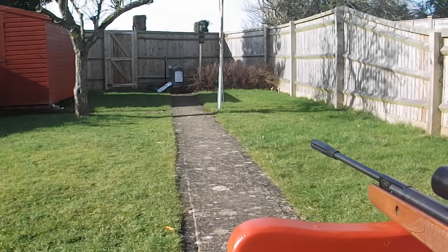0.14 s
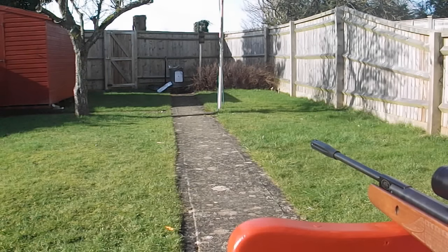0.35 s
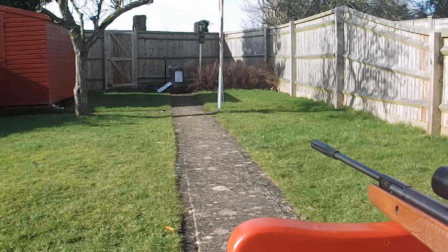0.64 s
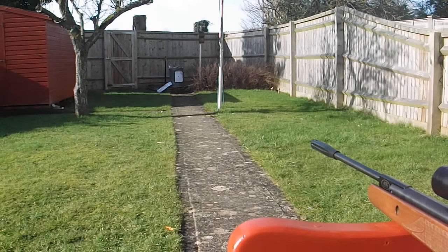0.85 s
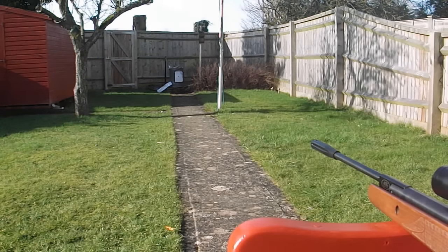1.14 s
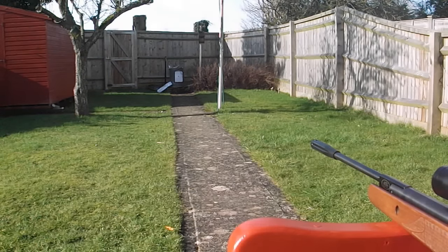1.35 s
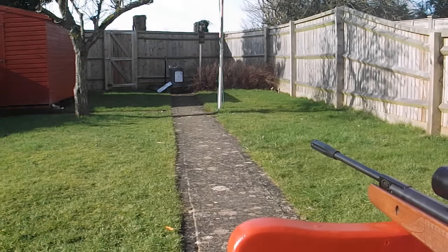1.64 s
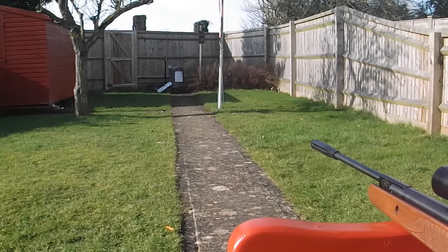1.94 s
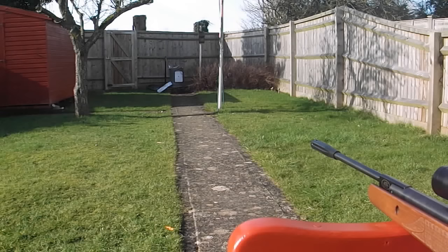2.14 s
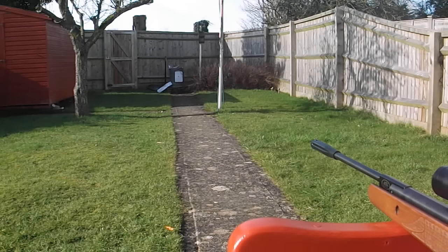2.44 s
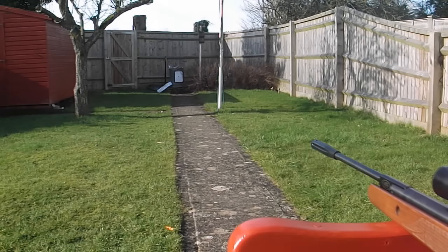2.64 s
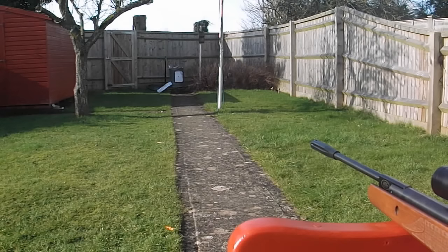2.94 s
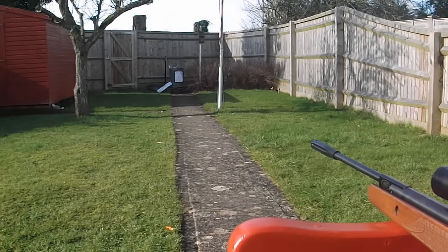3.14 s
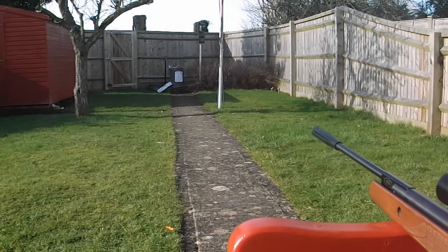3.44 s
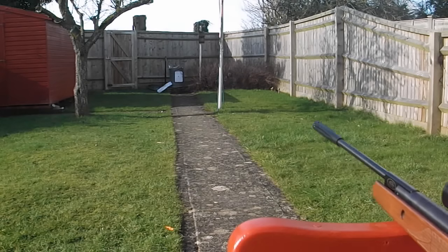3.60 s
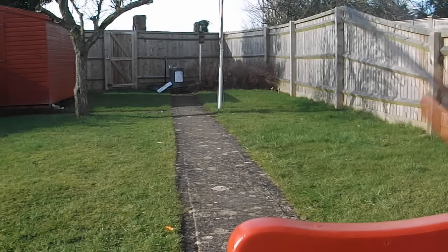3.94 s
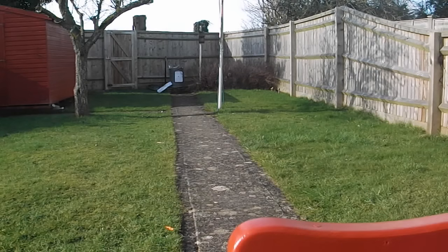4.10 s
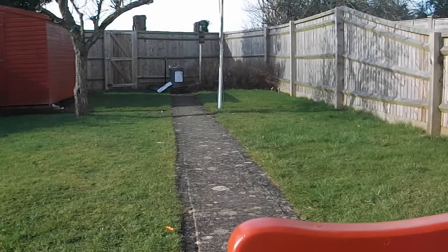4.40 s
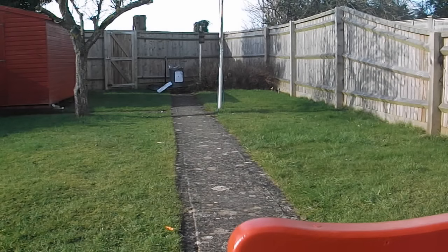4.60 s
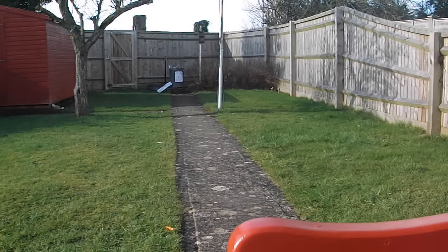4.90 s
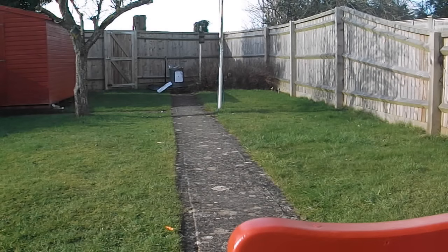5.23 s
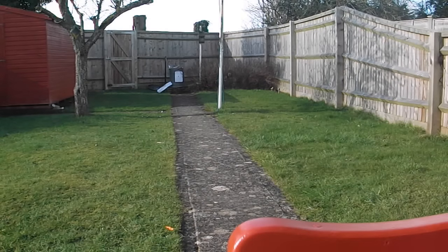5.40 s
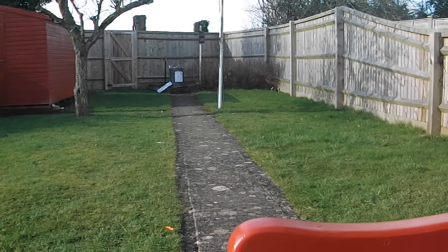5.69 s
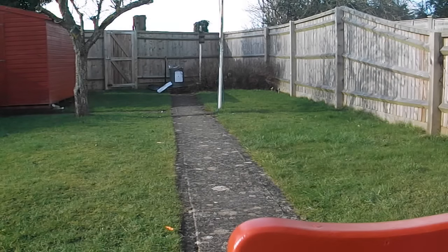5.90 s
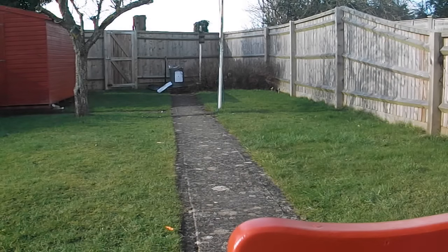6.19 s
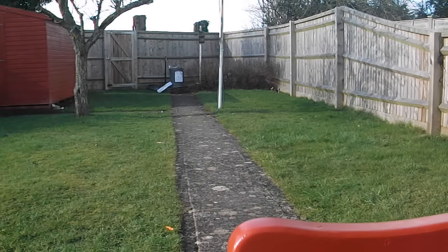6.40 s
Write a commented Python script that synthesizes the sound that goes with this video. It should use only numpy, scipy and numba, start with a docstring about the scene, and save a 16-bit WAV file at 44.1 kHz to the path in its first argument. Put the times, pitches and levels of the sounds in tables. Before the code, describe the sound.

A close outdoor camera microphone with rumble, faint hiss and thin whine. High bird whistles play for nearly three seconds until a spring air rifle snaps, clipped and dry, its pellet slapping a target a tenth of a second later. Fences and trees scatter the tail. The overloaded level drops and recovers; sleeves brush lightly, then two groups of metallic latch clicks ring out, the second with a small dry squeak.

```python
"""A fenced garden, where a spring air rifle fires once and its pellet smacks a target at the far end.
Blows are decaying coloured noise and struck modes; fences and trees add echoes and diffuse scatter.
Cloth rubs, then the action clicks as steel resonances and squeaks as a gliding harmonic tone.
Filtered noise makes distant traffic; gliding, warbling sines make a small bird.
The camera overloads on the shot: its gain control ducks the background, then lets it climb back."""
import sys
import numpy as np
from scipy import signal
from scipy.fft import irfft, next_fast_len
from scipy.io import wavfile
from numba import njit

SR = 44100
rng = np.random.default_rng(int(sys.argv[2]) if len(sys.argv) > 2 else 0)


def wav_out(sig):
    """Save sig, one row per channel (or a flat mono array), as 16-bit PCM at SR to the path in sys.argv[1]."""
    wavfile.write(sys.argv[1], SR, np.round(np.clip(np.atleast_2d(sig).T, -1, 1) * 32767).astype(np.int16))


N = 288855  # samples
T = np.arange(N) / SR  # seconds


def undb(db):
    """Level law: decibels to amplitude gain."""
    return 10 ** (np.asarray(db) / 20)


def unit(x):
    """Normalization: scale to rms 1."""
    return x / np.sqrt(np.mean(x ** 2))


def noise(points, size=N):
    """Spectral shaping: random-phase noise of rms 1 through (hz, db) points."""
    hz, db = np.transpose(points)
    padded = next_fast_len(size, True)
    f = np.fft.rfftfreq(padded, 1 / SR)
    gain = undb(np.interp(np.log(f + 1), np.log(hz), db))
    phases = np.exp(2j * np.pi * rng.random(len(f)))
    return unit(irfft(gain * phases, padded)[:size])


def band(hz, width):
    """Resonance: white noise through two equal peak filters, each of the given width, at rms 1."""
    b, a = signal.iirpeak(hz, hz / width, fs=SR)
    once = signal.lfilter(b, a, rng.standard_normal(N))
    return unit(signal.lfilter(b, a, once))


def walk(rate, size=N):
    """Slow fluctuation: random knots, rate per second, joined by lines; spread near 1."""
    knots = rng.standard_normal(2048)
    return 1.4 * np.interp(T[:size] * rate, np.arange(len(knots)), knots)


def burst(points, decay, size=4096, rise=.00012):
    """Impact on many dense modes: coloured noise rises fast and dies exponentially."""
    fade = np.exp(-T[:size] / decay)
    x = noise(points, size) * fade * (1 - np.exp(-T[:size] / rise))
    # give it the energy of the exponential fade alone
    return x * np.sqrt(np.sum(fade ** 2) / np.sum(x ** 2))


def ring(hz, decay, size=4096):
    """Modal decay: one struck mode is an exponentially damped sine."""
    return np.sin(2 * np.pi * hz * T[:size]) * np.exp(-T[:size] / decay)


def add(out, s, x):
    """Superposition: mix x into out from time s."""
    i = int(s * SR)
    out[i:i + len(x)] += x[:N - i]


def swells(events):
    """Gaussian swells: sum of envelopes; each length spans the 1/e points."""
    return sum(undb(db) * np.exp(-(2 * (T - s) / length) ** 2) for s, length, db in events)


# reflection spectrum of fences and trees: hz, relative_db
FOLIAGE_AND_BOARDS = [(100, -17), (400, -11.5), (1000, -3), (2500, 9.5), (5300, 1), (7500, -7), (11000, -3),
                      (16000, -18.5)]


def smeared_reflection(decay, size=4096):
    """Diffuse reflection: a rough obstacle answers an impulse with a noise burst of unit energy."""
    pulse = burst(FOLIAGE_AND_BOARDS, decay, size)
    return pulse / np.sqrt(np.sum(pulse ** 2))


# spectrum of the outdoor air and traffic noise: hz, relative_db
AIR_SPECTRUM = [(12, -57.5), (20, -6.5), (70, 0), (176, -21.5), (200, -26.5), (239, -24.5), (378, -32),
                (476, -27), (527, -28), (647, -25.5), (974, -21.5), (2850, -44), (5130, -53.5),
                (6620, -58.5), (9000, -66), (11700, -94.5), (19800, -120)]
# spectrum of the camera's hiss: hz, relative_db
HISS_SPECTRUM = [(3000, -28.5), (7000, -6), (10000, 1.5), (12500, 2), (14000, -6), (16000, -5)]
# steady narrow bands, low traffic drone and the camera's thin whistle: hz, width_hz of one filter, level_db
STEADY_BANDS = [(64.74, 27.5, -36), (244.2, 27, -57), (10190, 100, -80.5), (11290, 790, -68.5),
                (15120, 60, -86)]
AIR_DB = -27.5  # before rumble and tyre wash get their own gains
WHINE_HZ, WHINE_DB = 11370, -64


def background(hiss_db=-66, flutter_db=1.5, rumble_db=-2, tyres_db=-2):
    """Band-split noise: traffic rumble and tyre wash fluctuate apart, over camera hiss and whine."""
    air = undb(AIR_DB) * noise(AIR_SPECTRUM)
    rumble = signal.sosfiltfilt(signal.butter(2, 250, fs=SR, output="sos"), air)
    tyres = (air - rumble) * undb(tyres_db + .5 * walk(9))
    rumble = rumble * undb(rumble_db + flutter_db * walk(13))
    drones = sum(undb(level) * band(hz, width) for hz, width, level in STEADY_BANDS)
    # a wandering phase broadens the whine slightly
    whine = undb(WHINE_DB) * unit(np.sin(2 * np.pi * WHINE_HZ * T + 0.64 * walk(40)))
    return rumble + tyres + drones + whine + undb(hiss_db) * noise(HISS_SPECTRUM)


# cars on the distant road: nearest_s, length_s between 1/e points, tyre_centre_hz, peak_level_db
PASSING_CARS = [(.4, 0.96, 940, -45), (2.3, 0.82, 970, -44), (4.147, .4, 770, -42.5),
                (5.331, .5, 1050, -40)]


def cars(width_hz=750):
    """Proximity: each distant car swells and fades as a band of tyre noise."""
    return sum(swells([(s, length, db)]) * band(hz, width_hz) for s, length, hz, db in PASSING_CARS)


def note(length, start_hz, end_hz, warble_hz, warble_rate=190):
    """Frequency modulation: a whistle glides while its pitch warbles at random."""
    n = int(length * SR)
    hz = np.linspace(start_hz, end_hz, n) + warble_hz * walk(warble_rate, size=n)
    return signal.windows.tukey(n, .5) * np.sin(2 * np.pi * np.cumsum(hz) / SR)


# clear whistles: start_s, length_s, start_hz, end_hz, level_db before the direct and echo gains
WHISTLES = [(.02, 0.15, 5350, 4860, -52), (.91, .15, 5230, 5450, -59), (0.963, .052, 3550, 2410, -52),
            (2.39, .11, 5520, 5600, -60), (2.68, .07, 4800, 5350, -62)]
# twittered phrases: start_s, length_s, middle_hz, warble_hz, level_db before the direct and echo gains
TWITTERS = [(.1, .5, 3910, 45, -59), (.52, .11, 5350, 330, -57.5), (1.11, .77, 4980, 250, -62.5),
            (1.9, .44, 5330, 100, -62)]
WHISTLE_WARBLE_HZ = 24.97
NOTE_S, NOTES_PER_S, NOTE_SPREAD_HZ = 0.14, 9, 330
# random and mean half-glides: a note sweeps this far either side of its middle
NOTE_GLIDE_HZ, NOTE_FALL_HZ = 220, 130


def bird(echo_decay=0.036, direct_db=-2, echo_db=-8):
    """Convolution: clear whistles and runs of mostly falling notes, blurred by the trees."""
    song = np.zeros(N)
    for s, length, start_hz, end_hz, db in WHISTLES:
        add(song, s, undb(db) * note(length, start_hz, end_hz, WHISTLE_WARBLE_HZ))
    for s, length, middle_hz, warble_hz, db in TWITTERS:
        count = round(length * NOTES_PER_S)
        for k, (pitch, slope) in enumerate(rng.standard_normal((count, 2))):
            hz = middle_hz + NOTE_SPREAD_HZ * pitch
            glide = NOTE_GLIDE_HZ * slope - NOTE_FALL_HZ
            whistle = note(NOTE_S, hz - glide, hz + glide, warble_hz)
            add(song, s + k / NOTES_PER_S, undb(db) * whistle)
    trees = smeared_reflection(echo_decay, size=SR // 2)
    return undb(direct_db) * song + undb(echo_db) * signal.fftconvolve(song, trees)[:N]


# spectrum of the crack: hz, relative_db
CRACK_SPECTRUM = [(200, -21), (600, -12), (1200, -6.5), (2700, 0), (4200, 1.5), (6000, -1.5), (9000, -8.5),
                  (15000, -22)]
# spectrum of the thump through the stock: hz, relative_db
THUMP_SPECTRUM = [(25, -3.5), (70, 9.5), (105, 7), (150, -14.5), (220, -20.5), (320, -4), (470, -3),
                  (800, -11.5), (2000, -38)]
# the recoil's low thud, then the modes of the wooden stock: hz, relative_db
STOCK_MODES = [(68, 4), (335, -1.5), (465, 2), (550, -12), (850, -5)]


def blow(decay, thump_db, ring_db, edge_db,
         ring_hz=5130, ring_decay=0.0049, stock_decay=0.009, stock_db=-6, knock_db=-5):
    """Impact excitation: one blow cracks, thumps the stock and rings the steel cylinder."""
    hz, crack_db = np.transpose(CRACK_SPECTRUM)
    colour = crack_db + np.interp(hz, [6000, 12000], [0, edge_db])
    crack = burst(np.column_stack([hz, colour]), decay)
    wood = sum(undb(stock_db + db) * ring(f, stock_decay) for f, db in STOCK_MODES)
    thump = undb(knock_db) * burst(THUMP_SPECTRUM, decay) + wood
    return crack + undb(thump_db) * thump + undb(ring_db) * ring(ring_hz, ring_decay)


# firing stroke (sear, cylinder, piston on its air cushion, piston home):
# start_s, level_db, decay_s, stock_thump_db before the knock and wood gains, steel_ring_db (both re level)
FIRING_STROKE = [(2.7874, -11.5, .0018, -1.5, -1.5), (2.7903, -1, 0.011, -19, 8),
                 (2.799, -5.5, 0.0027, 8.5, -8.5), (2.8042, 10, .005, -0.5, -24)]
# the loudest slaps of the mainspring as it settles: start_s, level_db
SPRING_SLAPS = [(2.8308, -2), (2.848, -6), (2.8612, 2), (2.872, -3.5)]
SHOT_EDGE_DB = 1  # treble tilt, reached at 12 kHz
RATTLE_DECAY_S, RATTLE_THUMP_DB, RATTLE_RING_DB, RATTLE_EDGE_DB = 0.0016, -26, -14, -19
# lighter chatter of the coils among those slaps
CHATTER_START_S, CHATTER_LENGTH_S, CHATTER_DB, CHATTER_SCATTER_DB = 2.825, .082, -10, 2.5


def shot(count=12):
    """Successive impacts: sear, ringing cylinder, piston through the stock, then spring rattle."""
    out = np.zeros(N)
    for s, db, decay, thump_db, ring_db in FIRING_STROKE:
        add(out, s, undb(db) * blow(decay, thump_db, ring_db, SHOT_EDGE_DB))
    # one chatter at a random moment in each equal slot
    times = CHATTER_START_S + CHATTER_LENGTH_S * (np.arange(count) + rng.random(count)) / count
    levels = CHATTER_DB + CHATTER_SCATTER_DB * rng.standard_normal(count)
    for s, db in [*SPRING_SLAPS, *zip(times, levels)]:
        add(out, s, undb(db) * blow(RATTLE_DECAY_S, RATTLE_THUMP_DB, RATTLE_RING_DB, RATTLE_EDGE_DB))
    return out


# scatter in the garden: hz, level_db, t60_s
GARDEN_DECAY = [(100, -17.5, .5), (400, -5.5, .55), (1000, -3.5, .52), (2500, 0.5, 0.64), (5005, 0.5, 0.5),
                (7500, -6, .44), (11000, -6, 0.304), (16000, -13, .28)]


def garden(x, build=.007, count=25):
    """Diffuse reverberation: fences, shed and trees store each band's energy and let it die away."""
    hz, db, t60 = np.transpose(GARDEN_DECAY)
    edges = np.linspace(10, np.sqrt(16000), count) ** 2
    diffuse, out = rng.standard_normal(N), 0
    for lo, hi in zip(edges, edges[1:]):
        sos = signal.butter(3, [lo, hi], "band", fs=SR, output="sos")
        centre = (lo + hi) / 2
        energy = signal.sosfilt(sos, x + 1e-9 * diffuse) ** 2  # the trace of noise avoids silence
        # build-up, then decay: energy falls a millionfold in t60
        for seconds in (build, np.interp(centre, hz, t60) / np.log(1e6)):
            keep = np.exp(-1 / (seconds * SR))
            energy = signal.lfilter([1 - keep], [1, -keep], energy)
        carrier = unit(signal.sosfilt(sos, diffuse))
        out = out + undb(np.interp(centre, hz, db)) * np.sqrt(energy) * carrier
    return out


# slaps from the near fences: delay_s, level_db
FENCE_ECHOES = [(0.0233, -34.5), (0.033, -28.5), (.065, -25)]


def slaps(x):
    """Early reflection: delayed echoes from the near fences, smeared by their boards."""
    response = np.zeros(N)
    for delay, db in FENCE_ECHOES:
        add(response, delay, undb(db) * smeared_reflection(decay=0.0081))
    return signal.fftconvolve(x, response[:SR])[:N]


# the pellet smacks the target twice in quick succession, then a fainter, shorter slap echoes back:
# start_s, level_db, decay_s
TARGET_SMACKS = [(2.9151, 7, 0.0078), (2.9243, 8.5, 0.0052), (2.9938, 1, 0.0016)]
# spectrum of the smack: hz, relative_db
SMACK_SPECTRUM = [(100, -34), (300, -1.5), (750, 3), (1200, 2.5), (2500, 2), (3300, 0.5), (4800, 7),
                  (6500, -4.5), (9000, -12), (11000, -20.5), (16000, -30)]


def target():
    """Impact and echo: two smacks, then a fainter slap, each a quickly damped noise burst."""
    out = np.zeros(N)
    for s, db, decay in TARGET_SMACKS:
        add(out, s, undb(db) * burst(SMACK_SPECTRUM, decay))
    return out


# sleeve and hands brush the stock: middle_s, length_s between 1/e points, level_db before flutter
STOCK_RUBS = [(3.446, 0.13, -47), (3.762, 0.044, -48), (4.22, 0.19, -55.5), (4.653, .074, -54.5)]
# spectrum of cloth friction: hz, relative_db
CLOTH_SPECTRUM = [(800, 2), (3000, -2), (5200, 4), (7000, -13), (14000, -23)]


def rubs():
    """Friction noise: cloth hiss follows short, uneven swells of pressure."""
    return swells(STOCK_RUBS) * noise(CLOTH_SPECTRUM) * undb(2 * walk(140))


# latch and linkage clicks: start_s, level_db, body_tilt_db below about 2 kHz, edge_tilt_db above about 8 kHz
ACTION_CLICKS = [(5.3563, -15.5, 6, -1.5), (5.3755, -22.5, 11, -8), (5.385, -16.5, 12, -14),
                 (5.391, -16.5, 11, -11), (5.4063, -4.5, -3, 1.5), (5.5044, -10, 0, -12),
                 (5.679, -28.5, 17.5, -19.5), (6.0926, -26, -6, -11), (6.1196, -31, -2, -7),
                 (6.133, -21, -9, -4), (6.1397, -15, -2.5, 0), (6.2854, -4.5, -5.5, 8),
                 (6.4803, -22, 3, -4), (6.4875, -13, 1.5, 1)]
# spectrum shared by the steel parts: hz, relative_db
STEEL_SPECTRUM = [(150, -14), (700, -3.5), (1600, 1), (2700, -4), (4300, 0.5), (6000, 0.5), (8000, -8.5),
                  (11000, -16), (16000, -24)]
# ringing of the mainspring and barrel: hz, relative_db
SPRING_MODES = [(2649, -4), (2810, -7), (3284, -5), (3784, -10), (4170, -4), (4608, -11), (4920, -4),
                (5959, -3), (6137, -8)]
# spectrum of the dense upper coil modes: hz, relative_db
SHIMMER_SPECTRUM = [(2000, -18), (4000, 2), (6000, 4), (9000, 2), (13000, -13), (16000, -19)]
CLICK_HZ, CLICK_FALL_HZ_PER_DB = 4060, 68  # resonance of a 0 dB click; heavier parts hit harder, ring lower
CLICK_DECAY_S, BODY_DB_PER_DOUBLING = 0.0049, 25  # decay at 0 dB body; shaking the stock lengthens it


def action(resonance_db=5.5, width_hz=1000, spring_db=-36, spring_t60=0.5,
           shimmer_db=-42, shimmer_decay=0.093):
    """Coupled resonance: steel parts snap, each with its own peak, and set the spring ringing."""
    out = np.zeros(N)
    hz = np.geomspace(100, 16000, 80)
    steel_db = np.interp(hz, *np.transpose(STEEL_SPECTRUM))
    spring_decay = spring_t60 / np.log(1000)
    modes = np.array([undb(db) * ring(f, spring_decay, size=SR // 2) for f, db in SPRING_MODES])
    for s, db, body_db, edge_db in ACTION_CLICKS:
        peak_hz = CLICK_HZ - CLICK_FALL_HZ_PER_DB * db
        decay = CLICK_DECAY_S * 2 ** (body_db / BODY_DB_PER_DOUBLING)
        colour = steel_db + np.interp(hz, [1660, 3700, 5170, 8600], [body_db, 0, 0, edge_db])
        colour = colour + resonance_db * np.exp(-((hz - peak_hz) / width_hz) ** 2)
        add(out, s, undb(db) * burst(np.column_stack([hz, colour]), decay))
        # each snap drives the modes with random signs and slightly uneven strengths
        signs = rng.choice([-1, 1], len(modes))
        weights = signs * undb(2 * rng.standard_normal(len(modes)))
        add(out, s, undb(db + spring_db) * (weights @ modes))
        # a hard edge also reaches the dense upper modes of the coils
        shimmer = burst(SHIMMER_SPECTRUM, shimmer_decay, size=SR // 2)
        add(out, s, undb(db + edge_db + shimmer_db) * shimmer)
    return out


# one swing of the pivot: pitch and level away from the binding point
SQUEAK_START_S, SQUEAK_LENGTH_S, SQUEAK_HZ, SQUEAK_DB = 6.196, 0.087, 1025, -42.5
# where it binds: time, width, drop in pitch and rise in level
SAG_AT_S, SAG_WIDTH_S, SAG_HZ, SAG_GAIN_DB = 6.243, 0.021, 345, 11.5


def squeak(octave_db=-4, third_db=-20):
    """Stick-slip: the dry pivot sings in harmonics; as it binds, pitch sags and level grows."""
    out, n = np.zeros(N), int(SQUEAK_LENGTH_S * SR)
    binding = np.exp(-((SQUEAK_START_S + T[:n] - SAG_AT_S) / SAG_WIDTH_S) ** 2)
    phase = 2 * np.pi * np.cumsum(SQUEAK_HZ - SAG_HZ * binding) / SR
    tone = np.sin(phase) + undb(octave_db) * np.sin(2 * phase) + undb(third_db) * np.sin(3 * phase)
    level = undb(SQUEAK_DB + SAG_GAIN_DB * binding)
    add(out, SQUEAK_START_S, tone * signal.windows.tukey(n, .25) * level)
    return out


def scene(shot_wet_db=-9, target_wet_db=-1, handling_wet_db=-18):
    """Direct-to-diffuse ratio: the rifle is close and dry, the target far off and wet."""
    outdoors = background() + cars() + bird()
    gun, hit = shot(), target()
    handling = rubs() + action() + squeak()
    sent = undb(shot_wet_db) * gun + undb(target_wet_db) * hit + undb(handling_wet_db) * handling
    return (gun + hit + handling + slaps(gun + handling) + garden(sent) + outdoors)[None]


@njit
def gain_control(x, top, attack, hold, release, depth):
    """Feedback limiting: gain falls at attack dB/s above top, waits hold s, climbs at release dB/s."""
    y, cut, peak, wait = np.empty(len(x)), 0., 0., 0.
    for i in range(len(x)):
        y[i] = x[i] * 10 ** (-cut / 20)
        peak = max(abs(y[i]), peak * (1 - 1000 / SR))  # peak memory of about 1 ms
        wait -= 1 / SR
        if peak > top:
            cut, wait = min(cut + attack / SR, depth), hold
        elif wait < 0:
            cut = max(cut - release / SR, 0.)
    return y


MAX_CUT_DB, TOP_HZ = 17.0, 15700  # deepest gain cut, upper band limit


def record(dry, top=0.69, attack=870.0, hold=0.22, release=45.0):
    """Overload: the camera turns down after loud peaks, clips what gets through and cuts the top."""
    held = gain_control(dry[0], float(top), float(attack), float(hold), float(release), MAX_CUT_DB)
    lowpass = signal.firwin(301, TOP_HZ, fs=SR)
    return signal.fftconvolve(np.clip(held, -1, 1), lowpass, mode="same")[None]


dry = scene()
out = record(dry)
wav_out(out)
```